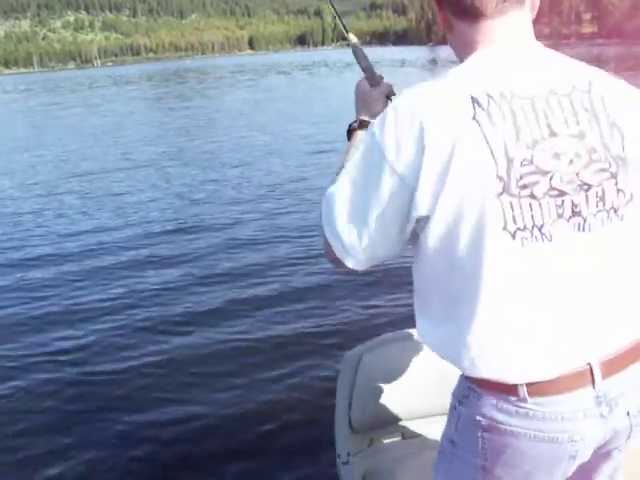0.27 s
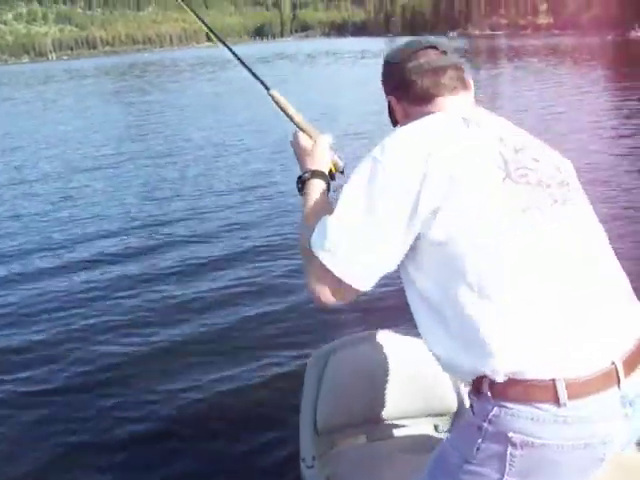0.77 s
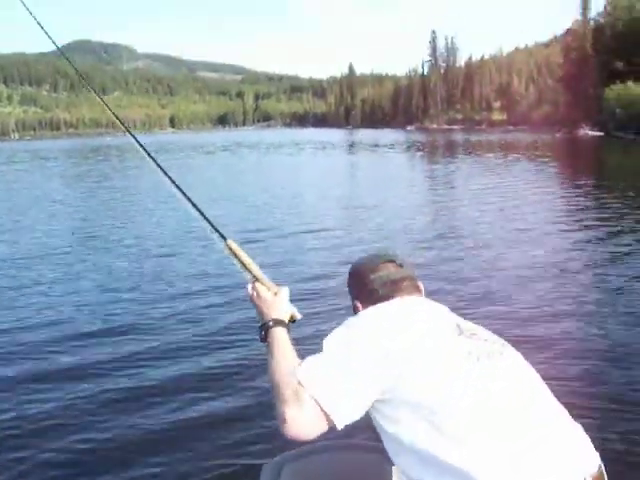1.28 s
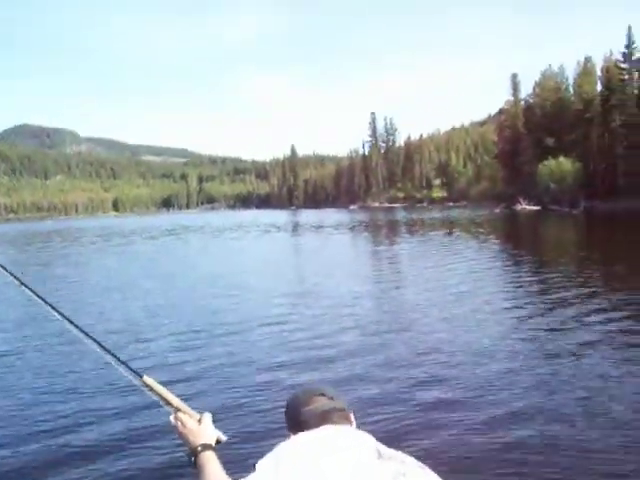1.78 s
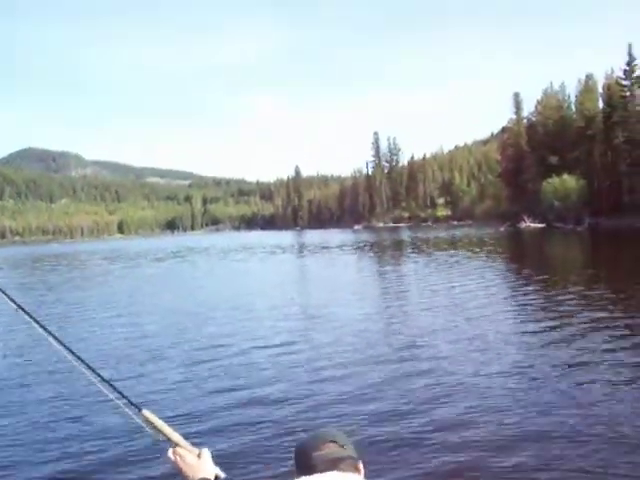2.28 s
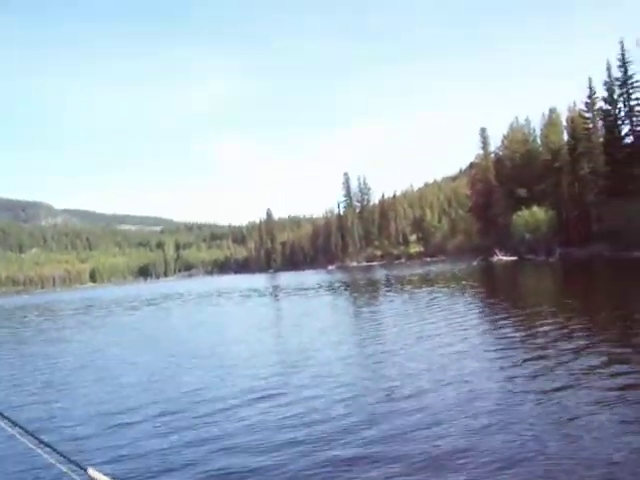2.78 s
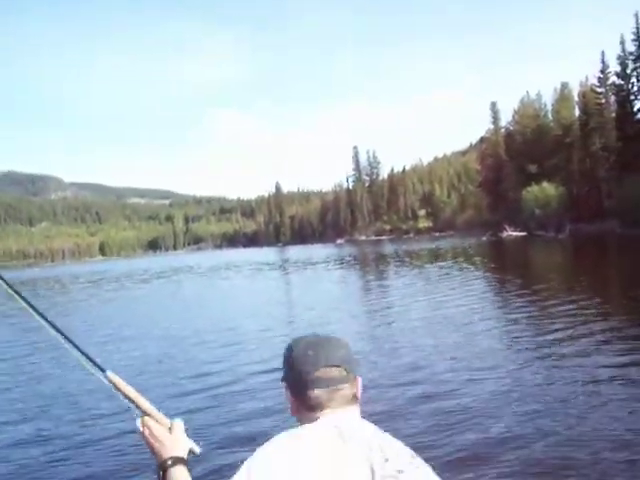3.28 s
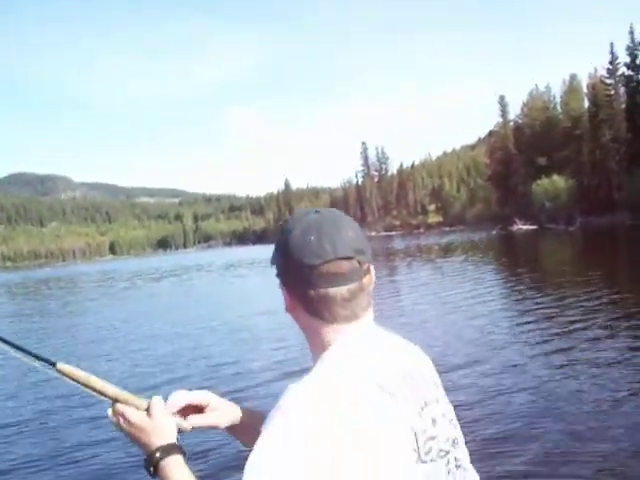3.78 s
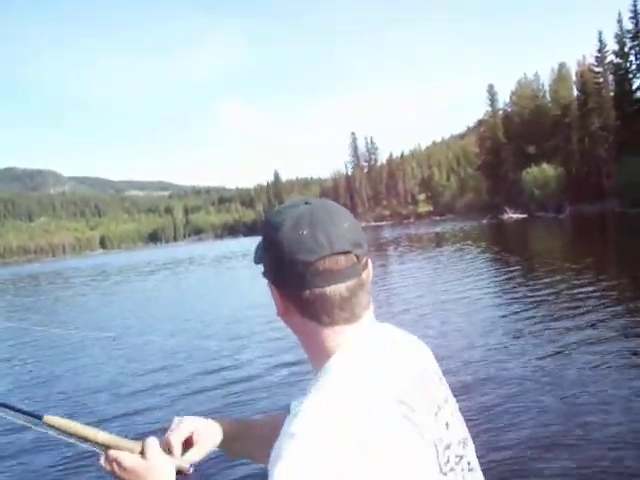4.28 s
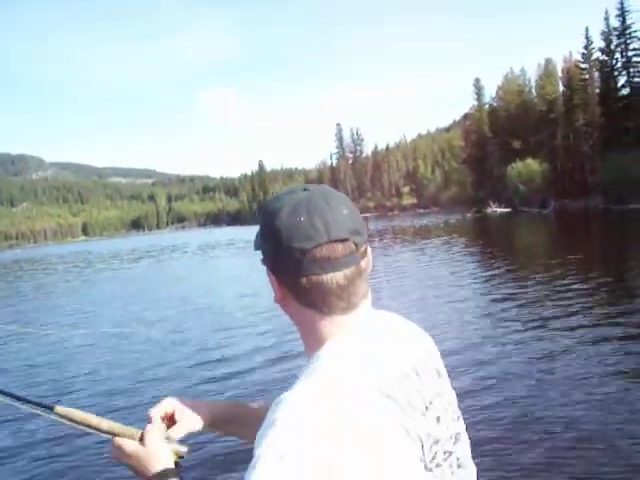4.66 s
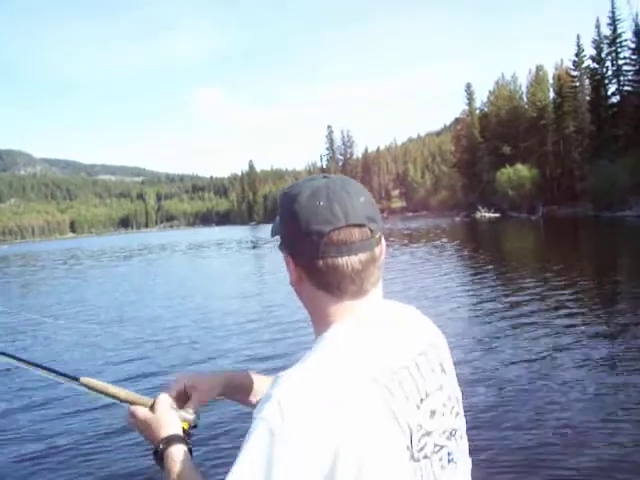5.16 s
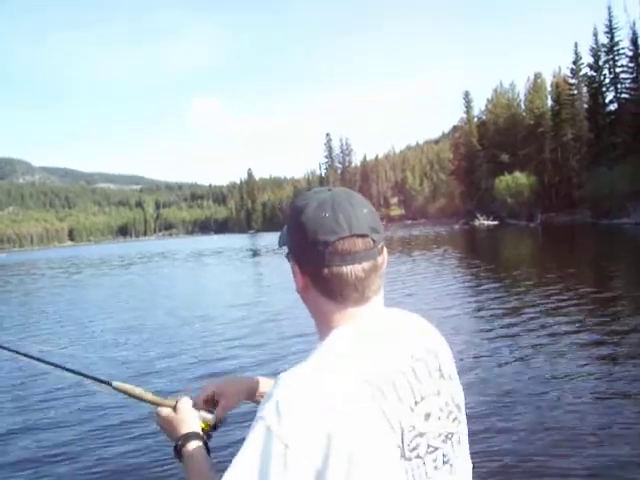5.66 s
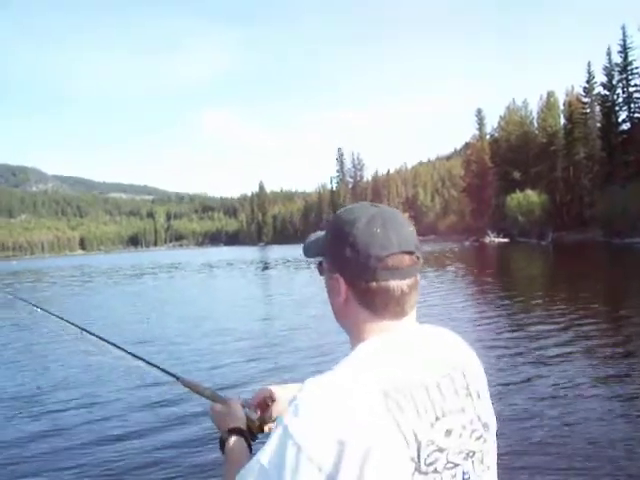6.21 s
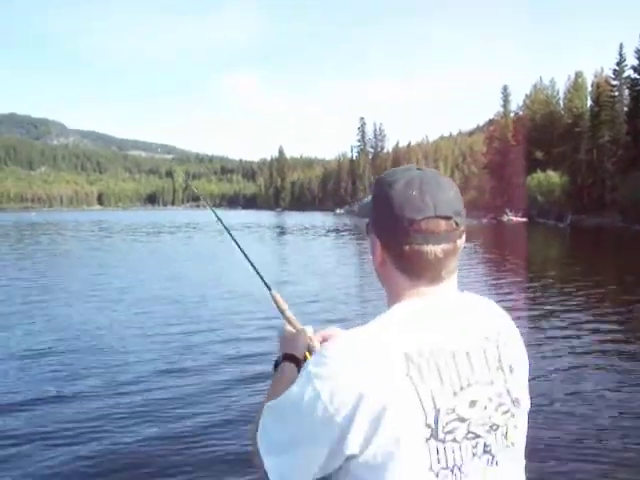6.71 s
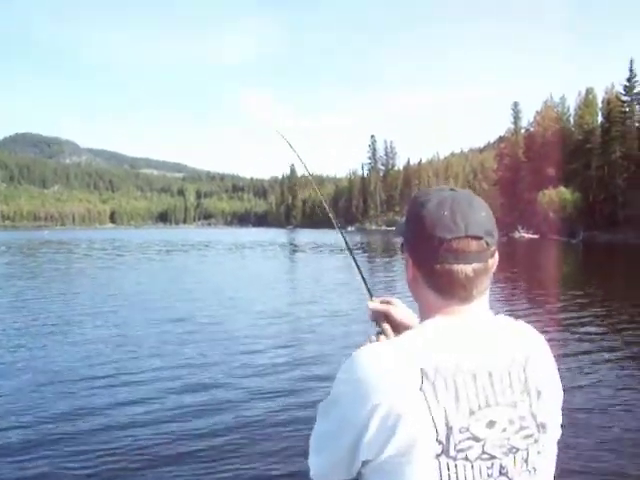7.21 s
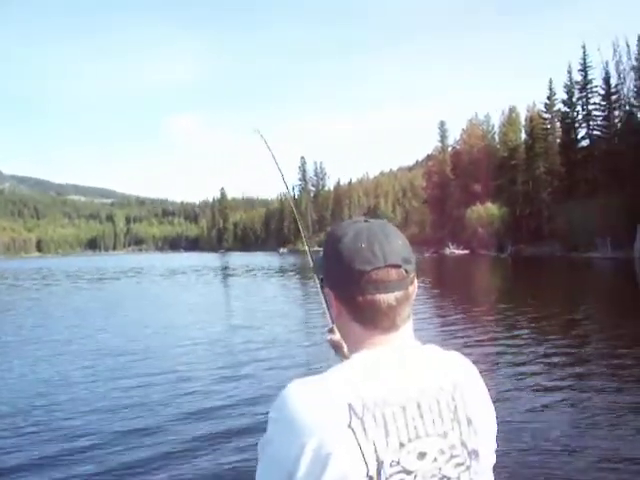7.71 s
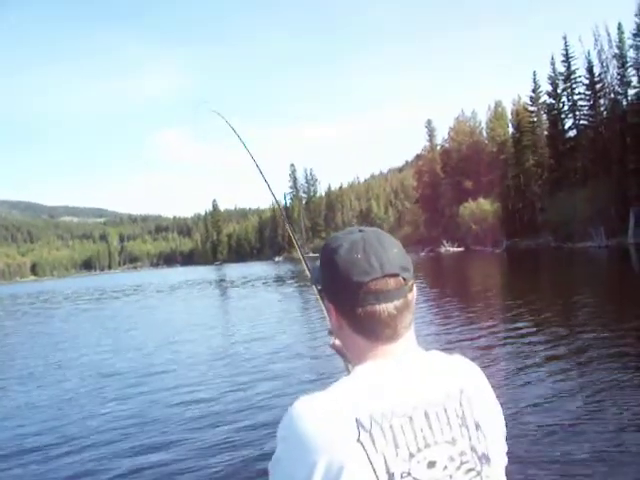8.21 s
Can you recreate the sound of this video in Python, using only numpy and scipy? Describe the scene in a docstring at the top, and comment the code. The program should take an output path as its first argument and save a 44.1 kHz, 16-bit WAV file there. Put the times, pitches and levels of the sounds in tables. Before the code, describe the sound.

A small camera on a boat picks up hollow slaps and low gurgling under the hull, droplets, faint rustles and soft wind. The strongest slaps come around two and a half and four seconds. Then a click, and a fishing reel is wound: a dry, metallic, rapid ratchet buzz pulsing about eight times a second, briefly easing midway before resuming. It slows into separate ticks and ends, leaving turned-down water sounds and a last click.

```python
"""Fly reel on a lake

An angler plays a fish from a small boat. Slaps of water are gliding notes amid bubble clouds that ring the hull;
droplets are short rings with spray, and gurgle, ripple and wind are coloured noise. Rubs are clumps of tiny slips
and clicks are damped metal modes. The cranked reel sums one pawl blow per ratchet tooth, surging with each stroke.
A small camera adds a faint whine, and its gain control turns everything down when the treble is loud."""
import sys
import numpy as np
from scipy import signal
from scipy.fft import rfft, irfft, next_fast_len
from scipy.io import wavfile
from scipy.ndimage import uniform_filter1d, map_coordinates

SR = 44100
rng = np.random.default_rng(int(sys.argv[2]) if len(sys.argv) > 2 else 0)


def unload_audio(sound):
    """Save the sound as a 16-bit wav file, at the path given as the first command line argument."""
    columns = np.transpose(np.atleast_2d(sound))
    # keep every value between -1 and 1, then stretch to whole-number steps
    steps = np.round(np.clip(columns, -1, 1) * 32767)
    wavfile.write(sys.argv[1], SR, steps.astype(np.int16))


N = 372644  # length in samples
TOP_HZ = 9250  # upper limit of the sound


def amp(db):
    """Decibel law: 20 dB is a tenfold amplitude."""
    return 10 ** (np.asarray(db) / 20)


def unit(x):
    """Normalisation: x at a root-mean-square of 1."""
    return x / np.sqrt(np.mean(x ** 2) + 1e-20)


def colour(points, hz):
    """Spectral envelope: gain through (Hz, dB) points joined on a log-frequency axis."""
    f, db = np.transpose(points)
    return amp(np.interp(np.log(hz + 1), np.log(f + 1), db))


def curves(rows):
    """Linear interpolation: one value per sample for each column after the time in seconds."""
    s, *columns = np.transpose(rows)
    return [np.interp(np.arange(N) / SR, s, column) for column in columns]


def wobble(rate):
    """Slow random modulation: a smooth curve through this many random knots a second."""
    return map_coordinates(rng.standard_normal(4096), [np.arange(N) * rate / SR], mode="wrap")


def filtered(x, response):
    """Linear filtering: the spectrum of x times a response of frequency in Hz."""
    m = next_fast_len(len(x) + 8192)
    return irfft(rfft(x, m) * response(np.fft.rfftfreq(m, 1 / SR)), m)[:len(x)]


def band(hz, lo, hi, order=16):
    """Band-pass gain with rounded edges at lo and hi in Hz."""
    return 1 / np.sqrt((1 + (lo / (hz + 1)) ** order) * (1 + (hz / hi) ** order))


def resonances(modes, f):
    """Modal superposition: summed response of resonators given as (Hz, width Hz, dB)."""
    return sum(amp(db) * 1j * f * w / (c * c - f * f + 1j * f * w) for c, w, db in modes)


def noise(spectrum):
    """Coloured noise: a random signal shaped by a spectral envelope, at rms 1."""
    return unit(filtered(rng.standard_normal(N), lambda hz: colour(spectrum, hz)))


def fade(t, t60):
    """Exponential decay: down 60 dB when t reaches t60."""
    return np.exp(-np.log(1000) * t / t60)


def add(track, s, sound):
    """Superposition: mix a sound into the track at time s in seconds."""
    room = track[max(round(s * SR), 0):][:len(sound)]
    room += sound[:len(room)]


def bubbles(times, pitch_hz, sizes, cycles, length, size=768):
    """Damped oscillators: a sum of tiny rings, each down 60 dB within some cycles and cut off after size samples."""
    t = np.arange(size) / SR
    turns = pitch_hz[:, None] * t
    rings = sizes[:, None] * np.sin(2 * np.pi * turns) * fade(turns, cycles)
    rings *= (1 - np.exp(-2 * turns)) * (1 - t / t[-1])  # soft onset, clean end
    where = (times * SR).astype(int)[:, None] + np.arange(size)
    return np.bincount(where.ravel(), rings.ravel(), length)[:length]


def wind(gust_db, level_db=-1):
    """Turbulent pressure: a light breeze buffets the microphone as low noise with random gusts."""
    # Each row: time in seconds, level before gusts and level_db in dB
    breeze = [(0, -49.5), (1.3, -49.5), (2.3, -47.5), (2.75, -43), (3.4, -52), (4.2, -47), (5.5, -45.5),
              (7.7, -45.5), (7.96, -37), (8.15, -45)]
    # Each row: frequency in Hz, relative level of the rumble in dB
    rumble = [(8, -11), (25, 4), (70, -0.5), (110, -12.5), (200, -26.5), (500, -55)]
    breeze_db, = curves(breeze)
    return amp(breeze_db + level_db + gust_db * wobble(6.8)) * noise(rumble)


def lake(slapping, gurgle_db=0, ripple_db=-58, ripple_follows=0.48, fizz_db=-59.0, patter_db=-7, count=700):
    """Agitated water: gurgle, ripple and patter follow the swell, slaps stir up gurgle, fizz is steadier."""
    # Each row: time in seconds, level in dB of the water stirring under the boat
    stirring = [(0, -53), (1.1, -49), (1.5, -57), (2.3, -49), (2.95, -46), (3.6, -53), (4.6, -55.5),
                (6.7, -56), (8.45, -54)]
    # Each row of these three spectra: frequency in Hz, relative level in dB
    gurgle_colour = [(50, -15.5), (110, 5), (200, 0), (330, -1), (500, -8.5), (900, -23.5), (2000, -50.5)]
    ripple_colour = [(300, -30), (600, -2.5), (1000, 0.5), (1600, -6), (2400, -8.5), (4000, -16.5)]
    fizz_colour = [(1200, -23), (2300, 0), (3500, 2.5), (5500, 3), (7500, 3), (9000, -6.5)]
    stir_db, stir_s = -17, 0.076  # gurgle that a slap leaves behind: level, time constant of its power

    swell_db, = curves(stirring)
    keep = np.exp(-1 / (stir_s * SR))
    stirred = amp(stir_db) * np.sqrt(signal.lfilter([1 - keep], [1, -keep], slapping ** 2))
    gurgle_level = np.hypot(amp(swell_db + gurgle_db), stirred)
    gurgle = gurgle_level * amp(2 * wobble(18)) * noise(gurgle_colour)

    patter_hz = 1700 * np.exp(0.615 * rng.standard_normal(count).clip(-2, 2))
    patter_sizes = amp(4 * rng.standard_normal(count))
    patter = bubbles(rng.random(count) * N / SR, patter_hz, patter_sizes, 36, N)
    ripple_level_db = ripple_db + ripple_follows * (swell_db - swell_db.mean()) + 1.2 * wobble(22)
    ripple = amp(ripple_level_db) * (noise(ripple_colour) + amp(patter_db) * unit(patter))

    fizz = amp(fizz_db + 1.7 * wobble(31)) * noise(fizz_colour)
    return gurgle + ripple + fizz


def slaps(spread=0.43, cycles=7, waver=0.068, least_fall=.8, level_db=0, count=500):
    """Air-pocket resonance: air trapped under the hull sinks in pitch as its pocket widens, amid bubbles."""
    # Each row: start in seconds, level in dB, first pitch in Hz, t60 in seconds, clean tone's share of the power
    wavelets = [(.354, -37, 883, 0.082, 0.089), (.365, -31.5, 149.6, 0.4, 0.24),
                (.378, -40, 323, 0.21, 0.87), (1.153, -29, 695, 0.23, 0.6), (1.178, -34.5, 285, 0.55, .58),
                (1.401, -45, 683, 0.21, 0.18), (1.493, -40.5, 916, 0.065, 0.19),
                (1.724, -40, 380, 0.41, 0.19), (1.81, -43, 416, 0.29, 0.39), (2.139, -46, 261, 0.13, 0.2),
                (2.489, -37.5, 1620, 0.41, 0.1), (2.496, -20.5, 366, 0.12, 0.62),
                (2.515, -29, 115, 0.23, 0.24), (2.58, -40, 312, 0.053, 0.97), (2.721, -43, 323, .19, 0.61),
                (2.82, -34.5, 360, 0.093, 0.56), (2.873, -25, 707, 0.17, 0.18),
                (3.003, -33, 375, 0.073, 0.64), (3.045, -35, 345, 0.058, 0.87),
                (3.109, -46.5, 328, .12, .4), (3.399, -50.5, 464, 0.52, 0.97),
                (3.83, -42.5, 353, 0.69, 0.15), (3.916, -28.5, 990, 0.16, 0.16),
                (3.990, -20, 424.6, 0.14, 0.79), (4.04, -39, 411.3, 0.5, 0.55), (4.162, -35, 827, .24, .4),
                (4.37, -41, 694, 0.18, 0.26), (5.436, -39, 600, 0.085, 0.11),
                (5.775, -26.5, 720, 0.19, 0.48), (6.258, -38, 259.8, .5, 0.68), (7.176, -37, 580, 0.15, .4),
                (7.338, -36, 2570, 0.18, .07), (7.565, -33, 1750, 0.19, 0.12),
                (7.678, -37.5, 540, 0.24, 0.066), (8.094, -26.5, 1360, 0.14, 0.13)]
    rise_cycles, glide_s = 3.8, .027  # the note builds up over some cycles; time constant of its fall
    # the smaller the pocket, the further its note sinks towards that of a wide one
    wide_pocket_hz, widening = 169.8, .38

    out, t = np.zeros(N), np.arange(SR // 3) / SR
    unsteady = wobble(120)
    for s, db, first_hz, t60, share in wavelets:
        last_hz = first_hz * min((wide_pocket_hz / first_hz) ** widening, least_fall)
        pitch = last_hz + (first_hz - last_hz) * np.exp(-t / glide_s)
        drift = unsteady[round(s * SR / 2):][:len(t)]
        note = np.sin(2 * np.pi * np.cumsum(pitch * (1 + waver * drift)) / SR)

        born = rng.random(count) * t[-1]
        cloud_hz = np.interp(born, t, pitch) * np.exp(spread * rng.standard_normal(count))
        cloud = bubbles(born, cloud_hz, rng.standard_normal(count), cycles, len(t))

        rise = rise_cycles / first_hz
        swell = np.minimum(t / rise, 1) * fade(np.maximum(t - rise, 0), t60)
        clean = np.clip(share, 0, 1)
        mixture = np.sqrt(clean) * unit(note) + np.sqrt(1 - clean) * unit(cloud)
        add(out, s, amp(db + level_db) * swell * mixture)
    return out


def hull(x, ring_db=-3, direct_db=-0.5):
    """Forced resonance: the hull rings on after each slap, beside the direct sound."""
    # Each row: frequency in Hz, width in Hz, relative level in dB of a mode of the hull
    hull_modes = [(270, 29, 7), (383, 55, -9), (580, 26, -11.5), (686, 7.3, -8), (880, 30, -16)]
    return filtered(x, lambda hz: amp(direct_db) + amp(ring_db) * resonances(hull_modes, hz))


def drops(level_db=-8, spread=0.24, cycles=17, plink_db=0, count=300):
    """Bubble resonance: each droplet rings one small bubble and scatters a spray of tiny rings around its pitch."""
    # Each row: start in seconds, level before level_db in dB, pitch in Hz of a droplet or small bubble
    droplets = [(.656, -36, 3610), (.672, -35.5, 940), (.725, -39, 1310), (.745, -31.5, 903),
                (1.076, -37, 3930), (1.0954, -40, 1680), (1.1476, -32, 1400), (1.161, -35, 1310),
                (1.494, -40, 1330), (1.529, -43, 1860), (1.725, -37.5, 1490), (1.81, -34.5, 4420),
                (1.9092, -29.5, 2097), (1.9682, -38.5, 4650), (2.0962, -37.5, 5700), (2.141, -33, 5020),
                (2.3451, -37.5, 1330), (2.486, -35, 1340), (2.490, -33, 3800), (2.6237, -45, 2690),
                (2.7257, -36.5, 1270), (2.858, -29, 2510), (2.8731, -27.5, 2150), (3.109, -31.5, 1030),
                (3.399, -31, 3240), (3.4457, -32.5, 2210), (3.718, -35, 4660), (3.8555, -31.5, 3910),
                (3.9106, -26, 1535), (3.9487, -37, 2580), (3.99, -32, 2360), (4.143, -31.5, 2500),
                (6.342, -30, 1340), (6.466, -31.5, 1500), (6.876, -31.5, 1278), (6.89, -35, 4270),
                (7.4826, -28, 2770), (7.544, -25.5, 1060), (7.56, -35.5, 3280), (7.661, -36.5, 1380),
                (7.629, -33, 2880), (7.652, -33, 6550), (8.096, -32.5, 3090), (8.3144, -26.5, 3180)]
    # a droplet of this pitch rings this long; bigger ones ring longer, by this power
    drop_t60_s, drop_hz, drop_law = 0.067, 2540, 0.26

    out, t = np.zeros(N), np.arange(SR // 10) / SR
    for s, db, hz in droplets:
        spray_hz = np.minimum(hz * np.exp(spread * rng.standard_normal(count)), TOP_HZ)
        spray = bubbles(rng.random(count) * t[-1], spray_hz, rng.standard_normal(count), cycles, len(t))
        plink = amp(plink_db) * np.sin(2 * np.pi * hz * t)
        t60 = drop_t60_s * (drop_hz / hz) ** drop_law
        envelope = fade(t, t60) * (1 - np.exp(-t / 0.00072))
        add(out, s, amp(db + level_db) * (unit(spray) + plink) * envelope)
    return out


def rustles(level_db=2, cycles=14, scatter_db=6, count=500):
    """Stick-slip friction: a rub of sleeve or line is a swelling clump of tiny slips."""
    # Each row: start in seconds, length in seconds, level before level_db in dB, centre in Hz, spread in log pitch
    rubs = [(0.066, 0.24, -49.5, 4900, 0.6), (0.657, 0.16, -57.5, 2850, 0.6), (.66, .17, -52, 920, 0.15),
            (1.074, .14, -51, 4370, 0.52), (1.086, .065, -47.5, 1380, .5), (1.637, .05, -52, 990, 0.55),
            (1.714, 0.11, -51.5, 4800, .12), (2.335, 0.098, -56, 3600, .55), (2.39, .12, -54, 4940, 0.15),
            (2.744, 0.064, -48, 4960, 0.18), (2.858, 0.046, -43.5, 3700, 0.5),
            (3.745, .13, -52, 4920, 0.44), (4.123, .05, -50, 2900, 0.31), (7.327, 0.049, -47.5, 3337, .42),
            (8.301, 0.032, -37.5, 3570, 0.3)]
    out, t = np.zeros(N), np.arange(SR // 2) / SR
    for s, length, db, hz, spread in rubs:
        pitch = np.minimum(hz * np.exp(spread * rng.standard_normal(count)), SR / 4)
        signs = rng.choice([-1, 1], count)
        sizes = amp(scatter_db * rng.standard_normal(count)) * signs * np.sqrt(pitch)
        slips = bubbles(rng.random(count) * length, pitch, sizes, cycles, len(t), size=256)
        swell = np.sin(np.pi * np.minimum(t / length, 1))
        add(out, s, amp(db + level_db) * swell * slips / np.std(slips[t < length]))
    return out


def tackle(level_db=-7, crack_db=-3, crack_t60=0.055):
    """Impulse response of metal: a click rings damped modes at new strengths, with a crack of noise."""
    # Each row: start in seconds, level before level_db in dB, extra level of the modes below 5500 Hz in dB
    clicks = [(3.8564, -49.5, 19.5), (3.901, -14.5, 1), (4.16, -30.5, -7), (4.2425, -47, -18),
              (8.2439, -33.5, -21), (8.3447, -22.5, -4)]
    # Each row: frequency in Hz, relative level in dB, t60 in seconds of a metal mode
    metal = [(3950, -25, 0.032), (4670, -3.5, 0.03), (5140, -1, 0.016), (6300, -5.5, 0.018),
             (7090, 1, 0.028), (7770, -10, 0.023)]
    out, t = np.zeros(N), np.arange(SR // 10) / SR
    for s, db, body_db in clicks:  # the balance of low and high modes differs from click to click
        ring = np.zeros(len(t))
        for hz, mode_db, t60 in metal:
            strength = amp(mode_db + body_db * (hz < 5500) + rng.normal(0, 1.85))
            ring += strength * fade(t, t60) * np.sin(2 * np.pi * (hz * t + rng.random()))
        crack = amp(crack_db) * fade(t, crack_t60) * rng.standard_normal(len(t))
        add(out, s, amp(db + level_db) * (ring + crack))
    return filtered(out, lambda hz: colour([(500, -28), (1500, -2), (4000, 2.0)], hz))


def hand(strokes, times):
    """Periodic driving force: level in dB per stroke, easing around the dead points of the crank."""
    ease_s, ease_lag_s = 0.028, 0.0028  # width of the easing, and its lag after the dead point
    s, _, _, db, ease_db = np.transpose(strokes)
    from_dead = (times[:, None] - s - ease_lag_s) / ease_s
    force_db = db[0] + (1 + np.tanh(from_dead[:, 1:])) / 2 @ np.diff(db)
    return force_db - np.exp(-from_dead ** 2) @ ease_db


def teeth(strokes, jitter):
    """Crank kinematics: when the pawl drops off each tooth as strokes speed up and slacken, with rate and level."""
    s, slack, peak, _, _ = np.transpose(strokes)
    t = np.arange(s[0], s[-1], 1 / SR)
    turn = np.interp(t, s, np.arange(len(s)))  # in half turns
    base = np.interp(t, s, slack)
    rate = base + (peak[turn.astype(int)] - base) * np.abs(np.sin(np.pi * turn)) ** 1.4
    passed = np.cumsum(rate) / SR
    count = np.arange(round(passed[-1]) + 1)
    passed = passed * count[-1] / passed[-1]  # the crank comes to rest on a tooth
    times = np.interp(count + jitter * rng.standard_normal(1024)[count], passed, t)
    return times, np.interp(times, t, rate), hand(strokes, times)


def reel(scatter_db=1, shift_db=2, snap_db=5, rattle_db=-21, rattle_t60=0.079, spool_db=-5, waver_db=3,
         level_db=4.0):
    """Ratchet impacts: the pawl snaps onto every tooth, pings and chatters there, and the spool resonates."""
    # Half turns of the crank, one list per spell of winding, the last row being the stop. Each row: start in
    # seconds, teeth per second at the start, teeth per second mid-stroke, relative level in dB,
    # easing of the hand at the start in dB
    winding = [
        [(4.274, 212, 277, -19.5, 0.5), (4.375, 117, 161, -19.5, 3.5), (4.505, 104, 283, -20, 2.5),
         (4.635, 70, 160, -19, 5.5), (4.740, 103, 242, -20.5, 6), (4.858, 82, 149, -20.5, 3.5),
         (4.975, 98, 293, -19.5, 1.5), (5.110, 100, 180, -19, 0.5), (5.195, 103, 334, -18, 3),
         (5.318, 80, 174, -18, 3), (5.435, 107, 278, -20, 6), (5.570, 98, 138, -21, 3),
         (5.685, 97, 288, -20.5, 3), (5.808, 91, 166, -23, 1), (5.895, 121, 260, -22, 3),
         (6.028, 50, 170, -24.5, 5), (6.164, 45, 40, -28, 3)],
        [(6.225, 205, 297, -22.5, 3.5), (6.340, 84, 190, -22, 4), (6.445, 104, 318, -23.5, 2.5),
         (6.595, 115, 173, -22.5, 3), (6.695, 70, 210, -26.5, 4), (6.836, 54.3, 60, -37, 0)],
    ]
    # Each row: frequency in Hz, relative level of the pawl's sound in dB
    pawl_colour = [(300, -58), (900, -25), (1500, -23.5), (2300, -12.5), (2950, -12.5), (3900, -12),
                   (4550, 0), (4950, 1), (5450, -5), (6000, -2), (6350, 0), (7400, 0), (8600, -1.5)]
    # Each row: frequency in Hz, width in Hz, relative level in dB of a mode of the spool
    spool_modes = [(1169, 21, -13.5), (1788, 36, -16.5), (2605, 59, -1.5), (3496, 57, -5.5), (4290, 40, 8),
                   (7270, 200, -2.5)]
    # The chatter dies fastest in the treble. Each row: lower edge in Hz, upper edge in Hz, t60 in seconds
    chatter_bands = [(0, 3900, .022), (3900, 5500, .017), (5500, 6800, .013), (6800, 10000, .012)]
    bounce_s, bounce_db = .0012, -5  # the pawl bounces once on the tooth: median flight, level
    # the pawl's own ping: central pitch, log scatter from tooth to tooth, life in cycles, level
    ping_centre_hz, ping_spread, ping_cycles, ping_db = 6586, .15, 71, -17.5
    # the buzz starts thin and grows fuller in its lower tones
    fuller_db_per_s, fuller_below_hz, mid_winding_s = 1.5, 4500, 5.4

    times, rate, force_db = np.hstack([teeth(strokes, jitter=.06) for strokes in winding])
    at = (times * SR).astype(int)

    def chance():
        """Independent scatter: one normal random value per tooth."""
        return rng.standard_normal(1024)[:len(at)]

    again = at + (bounce_s * SR * np.exp(.4 * chance())).astype(int)
    # at speed the pawl has less time to fall, so each blow is lighter
    sizes = amp(force_db + scatter_db * chance()) * np.sqrt(SR / rate)

    t, contact = np.arange(SR // 20) / SR, np.zeros(N)
    for lo, hi, t60 in chatter_bands:
        blows = np.zeros(N)
        # each blow differs a little in colour, at random and in slow drifts
        blows[at] = sizes * amp(shift_db * (chance() + wobble(18)[at]) / 2)
        blows[again] += blows[at] * amp(bounce_db)
        shape = (fade(t, t60) + amp(rattle_db) * fade(t, rattle_t60)) * (1 - np.exp(-t / 0.0011))
        power = np.abs(signal.oaconvolve(blows ** 2, shape ** 2)[:N])
        chatter = np.sqrt(power) * rng.standard_normal(N)
        snap = amp(snap_db) * np.roll(blows, SR // 2000)  # half a millisecond late
        strike = (chatter + snap) / np.sqrt(np.sum(shape ** 2) + amp(snap_db) ** 2)
        contact += filtered(strike, lambda hz: band(hz, lo, hi))

    ping_scatter = (chance() + wobble(30)[at]) / np.sqrt(2)
    ping_hz = np.minimum(ping_centre_hz * np.exp(ping_spread * ping_scatter), TOP_HZ)
    contact += amp(ping_db) * bubbles(times, ping_hz, sizes * chance() / 2, ping_cycles, N)

    # each mode of the spool is struck more or less squarely as it turns
    spool = np.zeros(N)
    for mode in spool_modes:
        struck = contact * amp(waver_db * wobble(14))
        spool += filtered(struck, lambda hz: resonances([mode], hz))

    buzz = filtered(contact, lambda hz: colour(pawl_colour, hz)) + amp(spool_db) * spool
    body = filtered(buzz, lambda hz: band(hz, 0, fuller_below_hz))
    fuller = amp(fuller_db_per_s * (np.arange(N) / SR - mid_winding_s))
    return amp(level_db) * (buzz - body + body * fuller)


def gain_control(x):
    """Automatic gain control: treble above a ceiling turns all down at once; the gain creeps back over seconds."""
    ceiling_db, recovery_db_per_s = -29.5, 0.82
    sense_s, sense_hz = 0.017, 2500  # averaging time of the level; only the treble above sense_hz counts
    treble = filtered(x, lambda hz: band(hz, sense_hz, SR / 2))
    level_db = 10 * np.log10(np.abs(uniform_filter1d(treble ** 2, int(sense_s * SR))) + 1e-20)
    recovered_db = recovery_db_per_s * np.arange(N) / SR
    excess_db = np.maximum(level_db - ceiling_db, 0)
    cut_db = np.maximum.accumulate(excess_db + recovered_db) - recovered_db
    return x * amp(-cut_db)


def scene():
    """Superposition of breeze, water, rubs, clicks and reel at one microphone."""
    slapping = hull(slaps())
    water = slapping + drops() + lake(slapping)
    return (reel() + tackle() + rustles() + water + wind(gust_db=1.0))[None]


def record(dry):
    """Transmission chain: the camera adds a thin whine, rolls off and notches the treble, and controls the gain."""
    # Each row: frequency in Hz, gain of the treble roll-off in dB
    roll_off = [(7600, 0), (8300, -7), (8700, -17.5), (9000, -32), (9300, -61)]
    # Each row: frequency in Hz, width in Hz of a narrow dip in the treble
    notches = [(7870, 68), (8140, 55)]

    def dips(f):
        """Band-stop filtering: the product of the notch responses."""
        return np.prod([(c * c - f * f) / (c * c - f * f + 1j * f * w) for c, w in notches], axis=0)

    whine = amp(-67) * np.sin(2 * np.pi * 6221 * np.arange(N) / SR)
    heard = filtered(dry[0] + whine, lambda hz: colour(roll_off, hz) * dips(hz))
    return filtered(gain_control(heard), lambda hz: hz < TOP_HZ)[None]


dry = scene()
out = record(dry)
unload_audio(out)
```